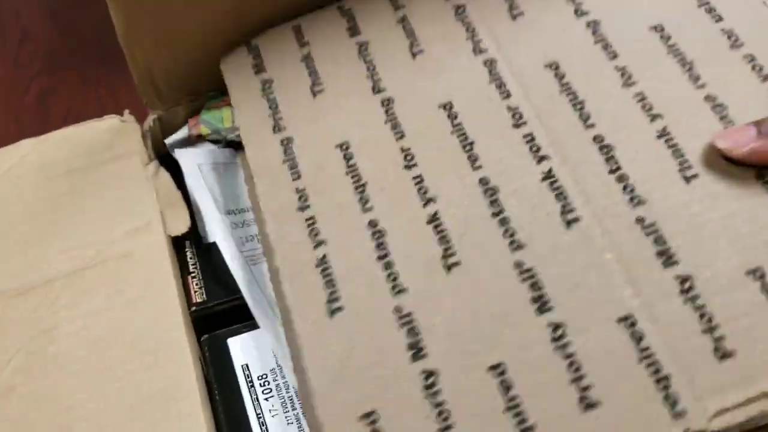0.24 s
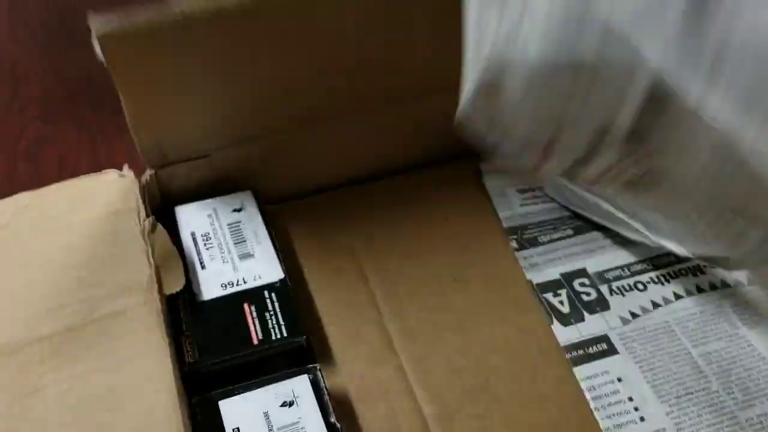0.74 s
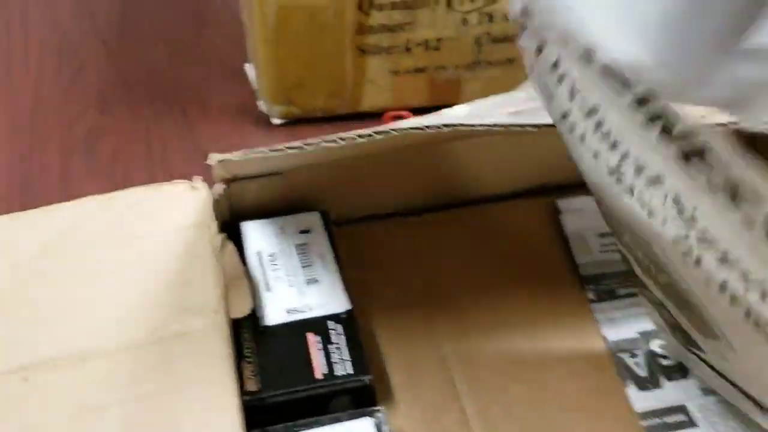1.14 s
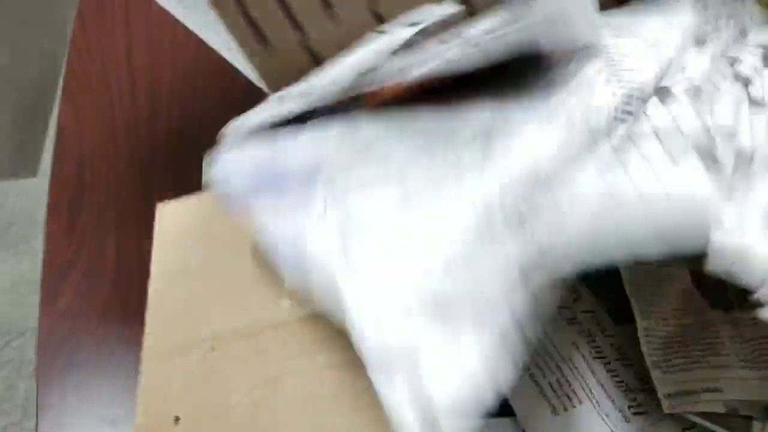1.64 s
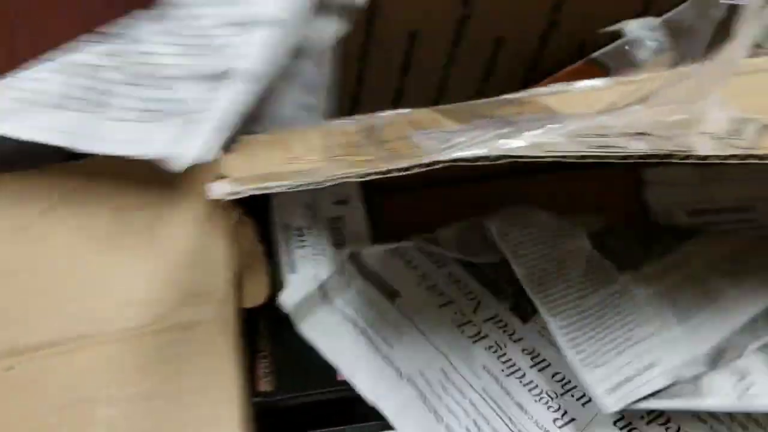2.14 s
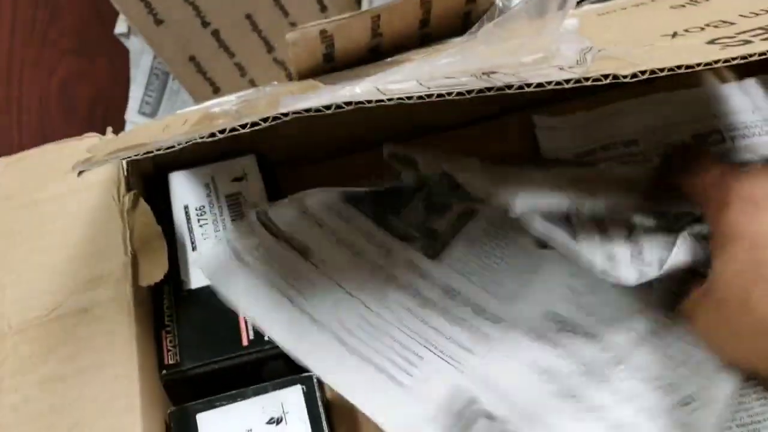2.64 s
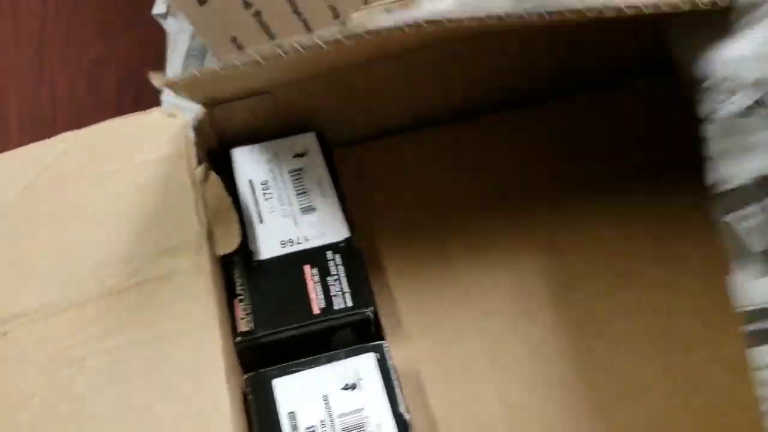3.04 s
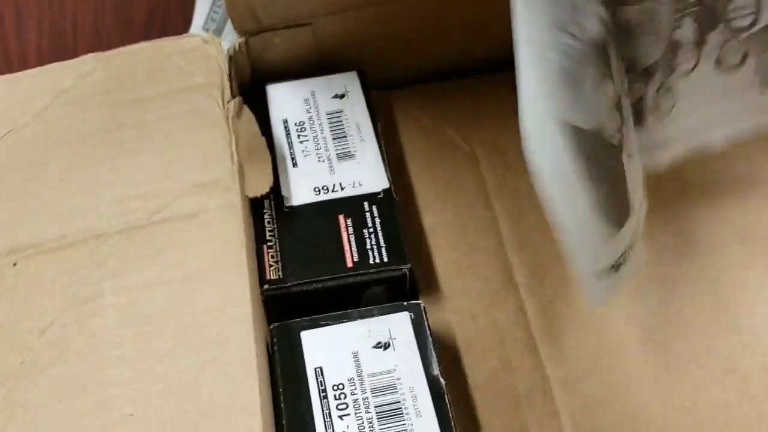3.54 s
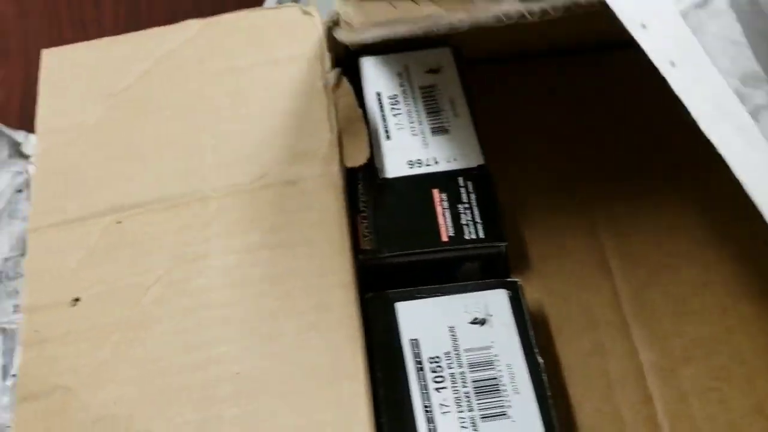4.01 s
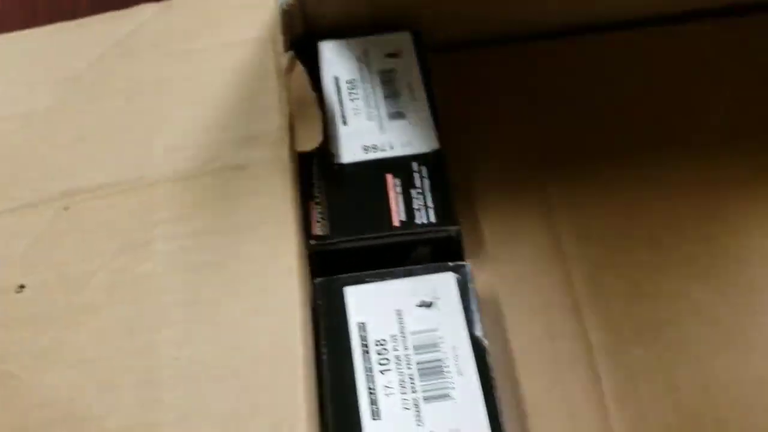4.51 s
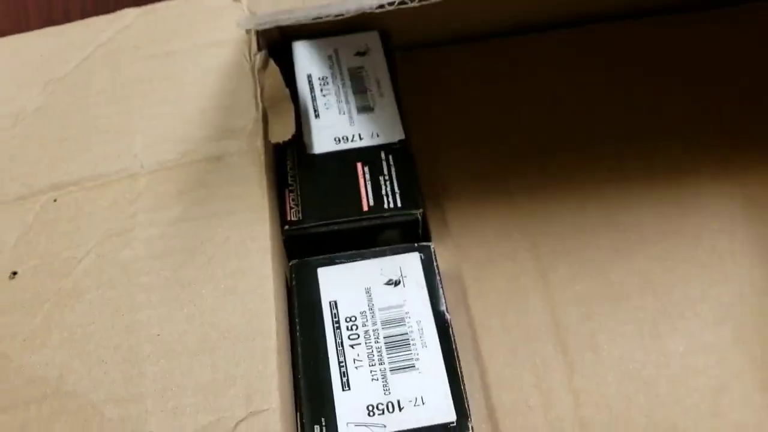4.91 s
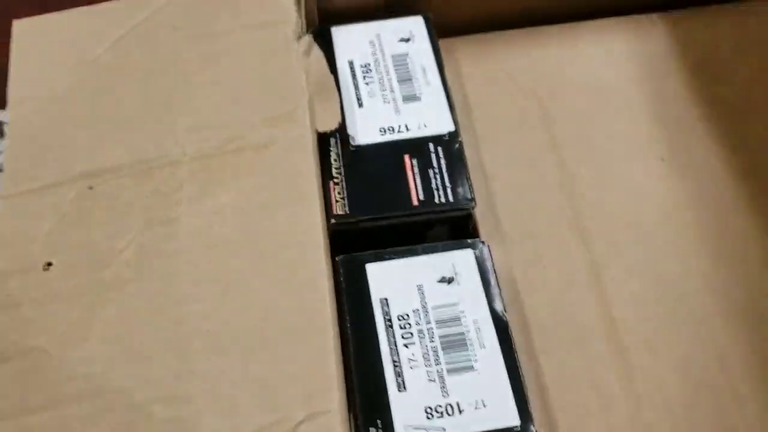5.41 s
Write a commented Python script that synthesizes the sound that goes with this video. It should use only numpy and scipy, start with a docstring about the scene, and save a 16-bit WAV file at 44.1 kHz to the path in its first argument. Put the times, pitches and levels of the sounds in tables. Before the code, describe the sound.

For the first second, a sheet of cardboard scrapes out of a box with a hollow rasp, over rustling newspaper and light knocks. The paper crinkles more softly until about 1.6 seconds, then picks up. Near 1.9 seconds the box is bumped with a deep, hollow boom, and smaller thumps follow until about 2.9. From 2.3 to 3.6 seconds the newspaper is at its loudest, dragged over the cardboard in uneven tugs, with many sharp, dry snaps as folds buckle. It eases around 4 seconds, gives another crackling burst at 4.3, and fades by 4.9. A short knock comes at about 5.1 seconds and a louder clattering knock on the box at 5.3, followed by a few faint paper ticks. Everything is close to a hand-held microphone with slight handling rumble, in a small room with a faint steady hum.

```python
"""Crumpled newspaper rustles and drags on cardboard as a hand pulls it out of a box, close to a
hand-held pair of microphones. The rustle is swarms of tiny creases; big folds snap as they buckle.
A sheet of card scrapes out in the first second, and the box booms, knocks and clacks when bumped.
The shaking microphones rumble; a small room answers and hums faintly."""
import sys
import numpy as np
from scipy import signal
from scipy.fft import rfft, irfft, next_fast_len
from scipy.io import wavfile

SR = 44100
rng = np.random.default_rng(int(sys.argv[2]) if len(sys.argv) > 2 else 0)


def to_wav(sig):
    """Store sig (one row per channel, or 1-D mono) as 16-bit WAV at the path in sys.argv[1].

    Samples outside -1..1 are clipped; the rate is SR.
    """
    pcm = np.clip(np.atleast_2d(sig), -1, 1) * 32767
    pcm = np.round(pcm).astype(np.int16)
    wavfile.write(sys.argv[1], SR, pcm.T)  # frames by channels


N = 249606
T = np.arange(N) / SR


def from_db(db):
    """Level to gain."""
    return 10 ** (np.asarray(db) / 20)


def unit_rms(x):
    """Scale to rms 1."""
    return x / np.sqrt(np.mean(x ** 2) + 1e-20)


def curve(rows):
    """(t/s, value) points to one value per sample."""
    return np.interp(T, *np.transpose(rows))


def butter(x, kind, hz, order=4):
    """Butterworth filter."""
    return signal.sosfilt(signal.butter(order, hz, kind, fs=SR, output="sos"), x)


def band(x, low_hz, high_hz):
    """Band-pass."""
    return butter(x, "band", [low_hz, high_hz], order=2)


def coloured(x, spectrum):
    """Minimum-phase filter with an (f/Hz, level/dB) response."""
    hz, db = np.transpose(spectrum)
    grid_hz = np.linspace(0, SR / 2, 513)
    gain = from_db(np.interp(np.log(grid_hz + 1), np.log(hz), db))
    taps = signal.minimum_phase(signal.firwin2(2047, grid_hz, gain ** 2, fs=SR), n_fft=2 ** 15)
    return signal.fftconvolve(x, taps[None], axes=-1)[..., :x.shape[-1]]


def drift(rate_hz):
    """Slow random wander, rms 1."""
    hop = 40
    pole = np.exp(-2 * np.pi * rate_hz * hop / SR)
    slow = signal.lfilter([1], [1, -2 * pole, pole * pole], rng.standard_normal(N // hop + 2002))[2000:]
    return np.interp(np.arange(N) / hop, np.arange(len(slow)), unit_rms(slow))


def ring(force, hz, t60_s):
    """One mode: a unit click starts a decaying sine of height 1."""
    r, w = from_db(-60 / (t60_s * SR)), 2 * np.pi * hz / SR
    return signal.lfilter([0, np.sin(w)], [1, -2 * r * np.cos(w), r * r], force + 1e-18)


def to_mics(x, lag_s):
    """Stereo pair; the left hears x later by lag_s."""
    return np.array([np.interp(T - lag_s / 2, T, x), np.interp(T + lag_s / 2, T, x)])


def puffs(per_s, t60_s, spread_db, clump_db=5.0):
    """Buckles or slips of uneven size, in random clumps; each is a short puff of noise."""
    born = rng.random(N) < per_s * from_db(clump_db * drift(25.)) / SR
    sizes = born * from_db(spread_db * np.minimum(rng.exponential(1, N), 4.5))
    power_decay = from_db(-120 / (t60_s * SR))
    power = signal.lfilter([1], [1, -power_decay], sizes ** 2 + 1e-18)
    return np.sqrt(power) * rng.standard_normal(N)


# Hand tugs: t/s, length/s, rustle level/dB, change over tug/dB,
# then re rustle: dull part/dB, fizz/dB, box panels/dB, box bottom/dB
TUGS = [(0.0, 0.0535, -36, -13.5, -11.5, -2.5, 4.5, 4), (0.07, 0.1052, -33, 3.5, -15, -5.5, -2, -3),
        (0.221, 0.076, -28.5, 0.5, -16, -5, -0.5, -6), (0.322, 0.0565, -34.5, 1, -8, -4.5, 0, -8.5),
        (0.406, 0.0855, -34, 4, -16.5, -8, -2, -7.5), (0.529, 0.2116, -30.5, -3.5, -10.5, -3, -4.5, -6.5),
        (0.769, 0.1772, -34.5, -1.5, -4, -6.5, -6.5, -8), (0.972, 0.1266, -43, -3, -3, -3, -2, -18),
        (1.13, 0.214, -47.5, 2, -7, 0, -8.5, -13.5), (1.374, 0.049, -43, -4.5, -7, -3, -10, -17.5),
        (1.458, 0.0904, -41.5, -3, -4, -2.5, -2.5, -28.5), (1.594, 0.134, -36.5, -6, -2.5, -3, -1.5, -1),
        (1.72, 0.111, -30.5, -3, -3.5, -5, -3.5, -6.5), (1.855, 0.18, -31.5, -2.5, -4.5, -5.5, 0, 2),
        (2.035, 0.144, -41.5, -6, -4, -2.5, -4, 2.5), (2.198, 0.0279, -30.5, 1.5, -8.5, -6, -3, 1),
        (2.258, 0.0554, -32, 5, -14, -5.5, -3.5, -3.5), (2.378, 0.058, -36, -0.5, -15, -8.5, -15, -4.5),
        (2.458, 0.127, -36.5, -0.5, -5.5, -6, -4, -3), (2.632, 0.1086, -30, -1.5, -5, -8, -2.5, -1.5),
        (2.744, 0.0646, -37, 9, -3, -3, -8, -5), (2.792, 0.139, -28.5, -4, -11.5, -5, -2, -4),
        (2.938, 0.084, -33.5, 5, -10, -4, -4.5, -11), (3.041, 0.0297, -35, 7.5, -9, -8, -8.5, -11),
        (3.097, 0.0757, -36.5, 9.5, -30.5, -4.5, -2.5, -4), (3.205, 0.1017, -31, -2.5, -5, -5.5, -2.5, -10),
        (3.363, 0.1246, -27, 1, -29.5, -6, -2, -14.5), (3.507, 0.078, -40.5, 1, 2.5, -7, -8.5, 1),
        (3.585, 0.08, -32.5, -4, -1, -5.5, -6.5, -6.5), (3.685, 0.1023, -32, -2, -4, -6, -9, -10),
        (3.886, 0.0683, -38, -10.5, 2, -7.5, -3.5, -5), (4.031, 0.059, -58, -0.5, 1, -10, 4, -13.5),
        (4.171, 0.0547, -53, 12, -5, -3, -3.5, -7.5), (4.273, 0.0655, -30.5, 0, -7.5, -12.5, -10, -10.5),
        (4.358, 0.1045, -31.5, -6.5, -5.5, -10.5, -6.5, -10.5),
        (4.504, 0.036, -41.5, 5.5, -8.5, -5, -6, -7.5), (4.572, 0.0203, -35, -3.5, 3.5, -6.5, -4, -30.5),
        (4.653, 0.205, -46, -3.5, -3, -2, -4, -6.5), (5.084, 0.03, -44, -8.5, -14, 4.5, -2, -19),
        (5.15, 0.0327, -45, 1.5, -10, 3, 2.5, -4), (5.214, 0.117, -54, 10, -5.5, 3, 7, 7.5),
        (5.308, 0.134, -34, -26.5, -7, -6.5, -5.5, -3.5), (5.436, 0.0578, -50, 3.5, -5.5, -6, -0.5, 5),
        (5.528, 0.026, -49.5, 0.5, -7, 4, 4, -13), (5.588, 0.017, -44.5, -2, -6.5, 2, -6.5, -12.5),
        (5.657, 0.018, -54.5, -7, 1.5, -10, 4.5, 10.5)]

def tug_levels_db():
    """Tugs swell, hold, let go; the sheet unfolds on softly. Gives rustle, dull, fizz, panels, bottom."""
    attack_s, release_db_per_s = 0.0481, 465
    settle_db, settle_db_per_s = -28, 11
    power, t = 1e-12, T[::20]
    for start_s, length_s, db, change_db, *parts_db in TUGS:
        swell = np.clip(1 + (t - start_s) / attack_s, 0, 1) ** 2
        hold = from_db(db + change_db * np.clip((t - start_s) / length_s, 0, 1))
        after_s = np.maximum(t - start_s - length_s, 0)
        release = from_db(np.maximum(-release_db_per_s * after_s, settle_db - settle_db_per_s * after_s))
        power = power + (swell * hold * release * from_db([0, *parts_db])[:, None]) ** 2
    return [np.interp(T, t, db) for db in 10 * np.log10(power)]


# Colour of sheet and microphones: f/Hz, level/dB
PAPER_SPECTRUM = [(410, -29), (700, -8.5), (1200, -5), (1630, -4), (2600, 0), (4200, 3), (5240, 1.5),
                  (6200, -2.5), (7540, -0.5), (8700, -10), (12400, -2.5), (15250, -3.5), (15800, -10)]
# Ring of each part of the sheet: f/Hz
PART_HZ = [1648, 2780, 3450, 4250, 5930, 6196, 7640, 11300]
# Place of each part: left lag/s
PART_LAG_S = [-.00042, .0002, -.00008, -.0003, .0001, -.00015, .0005, .00004]

def rustle(level_db, dull_db, fizz_db):
    """Creases, lone crinkles and dry ticks all over the sheet; slack paper is dull, taut paper fizzes."""
    swarm = 0
    for hz, lag_s in zip(PART_HZ, PART_LAG_S):
        creases = unit_rms(puffs(per_s=500, t60_s=0.0322, spread_db=2.5))
        small_folds = puffs(per_s=13, t60_s=0.0223, spread_db=1.3)
        crinkles = from_db(-14) * unit_rms(band(small_folds, hz / 1.3, hz * 1.3))
        ticks = from_db(-11) * unit_rms(puffs(per_s=40, t60_s=0.0099, spread_db=1.78))
        bend_gain = 0.425 * from_db(8.5 * drift(rate_hz=9.1))   # rings more or less as it bends
        ringing = bend_gain * band(creases, hz / 1.115, hz * 1.1035)
        swarm = swarm + to_mics(creases + ringing + crinkles + ticks, lag_s)
    swarm = coloured(swarm, PAPER_SPECTRUM)
    dull = unit_rms(butter(swarm, "low", 2400))
    middle = unit_rms(band(band(swarm, 2000, 9500), 2000, 9500))
    fizz = unit_rms(butter(swarm, "high", 8500))
    return from_db(level_db) * (from_db(dull_db) * dull + middle + from_db(fizz_db) * fizz)


# Box modes: f/Hz, level/dB, usual t60/s
BOX_MODES = [(109.93, -17, 0.346), (127.7, -6, 0.1104), (160, -2.5, 0.0955), (193.3, 8.5, 0.0162),
             (200.4, -4, 0.141), (239.99, 2.5, 0.0542), (276.3, 5.5, 0.0764), (338.3, 1, 0.1137),
             (368.4, 6, 0.0272), (411.6, 2, 0.0382), (475.7, 9, 0.0262), (620.1, 3, 0.0773),
             (734.8, 8.5, 0.0301), (744.7, -3.5, 0.1246), (923, -8, 0.0052), (1029, -18.5, 0.0113),
             (1310, -5, 0.0127), (1530, -4.5, 0.0226), (2010, -13, 0.0079), (2280, -13.5, 0.0134)]

def drag(panels_db, bottom_db):
    """Paper slides over the box in small slips that rasp and drive its damped modes."""
    t60_share = 0.342   # paper lying on the card damps it
    slips = unit_rms(puffs(per_s=1200, t60_s=0.00844, spread_db=2.9, clump_db=2.5))
    modes = np.zeros((len(BOX_MODES), N))
    for m, (hz, db, t60_s) in enumerate(BOX_MODES):
        coupling = (-1) ** m * (hz / 200) ** 0.457   # light paper moves low modes least
        modes[m] = from_db(db) * coupling * ring(slips, hz, t60_share * t60_s)
    deep = np.array(BOX_MODES)[:, 0] < 240
    rasp = band(puffs(per_s=1200, t60_s=0.007, spread_db=3.14, clump_db=2.5), 293, 1846)
    panels = unit_rms(unit_rms(modes[~deep].sum(0)) + 0.828 * unit_rms(rasp))
    bottom = unit_rms(modes[deep].sum(0))
    return from_db(bottom_db) * bottom + from_db(panels_db) * panels


# Card sliding out of the box: t/s, level/dB
SCRAPE_LEVEL = [(0.0, -46), (0.06, -57), (0.11, -42), (0.224, -43), (0.256, -37), (0.332, -45),
                (0.406, -39.5), (0.42, -26), (0.444, -47.5), (0.466, -34.5), (0.532, -64), (0.592, -36.5),
                (0.762, -43), (0.78, -34.5), (0.82, -51), (1.05, -59)]
# Card resonances: f/Hz, width/Hz, level/dB
CARD_BANDS = [(826, 204, 0.5), (1050.5, 146, 0), (1310, 220, -3.5), (1505, 285, -6.5)]

def scrape():
    """Dense slips of card on card rasp hollowly through its broad resonances."""
    silent_s = SCRAPE_LEVEL[-1][0] + .1
    level_db = curve(SCRAPE_LEVEL + [(silent_s, -90)])
    slips = puffs(per_s=900, t60_s=0.021, spread_db=3.47)
    rasp = sum(from_db(db) * band(slips, hz - width_hz / 2, hz + width_hz / 2)
               for hz, width_hz, db in CARD_BANDS)
    return to_mics(from_db(level_db) * unit_rms(rasp), lag_s=0.000136)


# Handling rumble: t/s, level/dB
SHAKE_LEVEL = [(0.0, -44.5), (0.22, -68), (0.28, -51.5), (0.38, -55.5), (0.49, -46), (0.55, -74),
               (0.6, -54), (0.71, -65.5), (0.77, -42.5), (0.98, -68.5), (1.83, -53), (1.84, -50.5),
               (2.27, -63), (2.32, -40.5), (2.38, -59), (2.49, -52.5), (2.95, -56.5), (3.0, -59.5),
               (3.51, -51), (3.55, -57.5), (4.22, -66), (4.32, -47.5), (4.93, -79), (5.03, -50.5),
               (5.14, -55.5), (5.26, -56.5), (5.31, -38.5), (5.44, -55.5), (5.5, -58), (5.66, -75.5)]

def shake():
    """The hand-held microphones shake: deep lumpy noise, slightly different in each."""
    mid, side = band(rng.standard_normal((2, N)), 42, 76)
    side = 0.24 * side
    return from_db(curve(SHAKE_LEVEL)) * unit_rms(np.array([mid + side, mid - side]))


# Noise floor: f/Hz, level/dB
HUM_SPECTRUM = [(15, -27), (25, -40.5), (76, -9.5), (219, -7.5), (420, -23.5), (1590, -28), (8520, -27.5),
                (9240, -30.5), (15100, -27), (16300, -13)]

def hum(level_db=-45):
    """Steady room and microphone noise, alike on both sides in the bass."""
    mid, side = rng.standard_normal((2, N))
    side = butter(side, "high", 500, order=2)
    return from_db(level_db) * unit_rms(coloured(np.array([mid + side, mid - side]), HUM_SPECTRUM))


def room(x, t60_s=0.258, wall_cut_hz=2260):
    """Wall echoes: eight feedback delays a side, duller on every round."""
    size = next_fast_len(N + SR)
    hz = np.arange(size // 2 + 1) * SR / size
    wall = 1 / (1 + 1j * hz / wall_cut_hz)
    response = np.zeros((2, len(hz)), complex)
    for k, lag_s in enumerate(rng.uniform(.006, .03, 16)):
        delay = np.exp(-2j * np.pi * hz * round(lag_s * SR) / SR)
        trip = from_db(-60 * lag_s / t60_s) * wall * delay
        response[k % 2] += trip / (1 - trip) * (-1) ** (k // 2)
    shared_bass = 1 / (1 + 1j * hz / 600)   # the microphones are close together
    mid = response.mean(0)
    response = mid + (1 - shared_bass) ** 2 * (response - mid)
    return irfft(response * rfft(x, size), size)[:, :N]


# Sharp snaps of paper folds and clacks on the box:
# t/s, level/dB, f/Hz, pitched band re broad noise/dB, t60/s, body re level/dB
SNAPS = [(.0777, -34.5, 7400, -7, 0.021, -14.5), (.23, -20.5, 3120, 10, 0.063, -14.5),
         (.4165, -20.5, 3700, 6.5, 0.085, -2.5), (.486, -22.5, 4800, 2.5, 0.023, -20),
         (.545, -21.5, 4600, -0.5, 0.044, -28), (.575, -18, 5020, -6.5, 0.0565, -21.5),
         (.8621, -19, 2050, -10, 0.052, -17.5), (.8967, -18.5, 3100, -6.5, 0.0127, -16.5),
         (.915, -24.5, 5230, 2.5, 0.0125, -30.5), (.927, -27.5, 2400, -1, 0.014, -21.5),
         (.937, -20.5, 6710, 8.5, 0.0114, -28.5), (.9587, -18.5, 3540, -3, 0.0165, -26.5),
         (.984, -25, 1900, 9.5, 0.0121, -23), (1.0056, -24, 4120, -17, 0.032, -17.5),
         (1.129, -25.5, 2480, 6.5, 0.023, -10), (1.169, -33, 7400, 9.5, 0.019, -18.5),
         (1.1946, -24, 5460, -2.5, 0.035, -13.5), (1.218, -25.5, 2530, 3, 0.026, -10),
         (1.238, -30, 1600, 8, 0.0226, -23.5), (1.255, -30.5, 3290, 10, 0.021, -22.5),
         (1.362, -23.5, 7260, 2, 0.053, -25.5), (1.382, -30.5, 6500, 5.5, 0.0156, -29.5),
         (1.4135, -27.5, 3700, -3.5, 0.04, -26), (1.4498, -21.5, 7260, 2, 0.024, -35),
         (1.4744, -25.5, 2600, 6.5, 0.0223, -22.5), (1.5898, -26, 1590, -14, 0.03, -16.5),
         (1.5998, -15.5, 1673, -3, 0.028, -33.5), (1.618, -21.5, 3020, 11.5, .02, -18.5),
         (1.6697, -19, 2070, -10, 0.047, -14.5), (1.6983, -16.5, 7360, 5.5, 0.0133, -18),
         (1.8256, -18, 3030, 11.5, 0.0133, -21), (1.8517, -19, 1780, 14, 0.0486, -1.5),
         (1.8851, -15, 5060, 6.5, 0.026, -9), (1.9395, -23, 4100, 6, 0.019, -20.5),
         (1.974, -12.5, 1370, -1, 0.068, -29.5), (2.185, -32, 3580, 4.5, 0.03, 1.5),
         (2.2739, -11.5, 4610, 17, 0.0176, -33.5), (2.2924, -6, 4130, 6, 0.0234, -21.5),
         (2.312, -13, 4800, 5.5, 0.026, -14.5), (2.325, -22.5, 6500, 3, 0.0088, -30),
         (2.377, -20, 3800, -14, 0.027, -16), (2.4153, -8.5, 4490, 1, 0.0184, -20),
         (2.4407, -12.5, 3190, -5, 0.022, -32), (2.4812, -13.5, 6560, -21.5, 0.014, -50),
         (2.5015, -13, 3530, 1, 0.0157, -11.5), (2.5389, -20, 1594, -2, 0.033, -31),
         (2.6135, -12, 3600, -15, 0.019, -30), (2.6549, -10.5, 3460, -1, 0.0445, -35.5),
         (2.7055, -11.5, 3500, 3.5, 0.017, -31.5), (2.7125, -6.5, 5620, -3, 0.0335, -36),
         (2.7464, -13, 3404, 0, 0.0345, -21.5), (2.7939, -27, 2750, -9, 0.062, -25.5),
         (2.8275, -4.5, 7590, -0.5, 0.0181, -18.5), (2.8722, -9, 5200, -1, 0.0098, -12.5),
         (2.9135, -12.5, 1700, -7, 0.0454, -18.5), (2.929, -13, 2460, -18.5, 0.0496, -22.5),
         (2.9941, -20.5, 4870, 4, 0.086, -15), (3.031, -16, 4500, 5.5, 0.016, -29),
         (3.0423, -14, 4080, -0.5, 0.026, -30.5), (3.057, -6.5, 5720, -4.5, 0.044, -28),
         (3.0695, -7, 4960, -2, 0.019, -15), (3.105, -21.5, 4290, 5, 0.0216, -16.5),
         (3.1254, -20, 4120, 3.5, 0.016, -3), (3.1958, -10, 4540, -18, 0.0505, -16),
         (3.2545, -18.5, 5000, 5, 0.017, -15.5), (3.2655, -7.5, 4200, 0.5, 0.021, -20),
         (3.2695, -13.5, 4120, 7.5, 0.019, -22), (3.288, -26, 6500, -0.5, 0.014, -21.5),
         (3.2956, -3.5, 8070, -2, 0.0158, -23), (3.3575, -11, 4200, -7.5, 0.032, -13.5),
         (3.3803, -2.5, 5170, 7.5, 0.0075, -18), (3.3826, -4.5, 6530, 4, 0.0112, -20),
         (3.434, -11.5, 7300, -2.5, .01, -31.5), (3.5225, -13, 5530, -16.5, 0.058, -19),
         (3.5798, -5, 6480, 6, 0.0113, -21.5), (3.597, -18.5, 6500, -1, 0.0197, -19.5),
         (3.6598, -25.5, 2240, -1, 0.0223, -6.5), (3.708, -15.5, 3480, -7, 0.038, -18),
         (3.716, -20.5, 2180, 1.5, 0.0253, -12.5), (3.741, -18, 3300, 5, 0.017, -24),
         (3.76, -25, 2260, 6, 0.0235, -24.5), (3.787, -23.5, 2740, 10.5, 0.0314, -16),
         (3.8745, -19.5, 3400, 0, 0.029, -13), (3.9883, -27.5, 6260, -1.5, 0.0576, -17),
         (3.997, -31, 4960, -8.5, 0.0284, -12.5), (4.0356, -32, 3570, -8.5, 0.128, -19.5),
         (4.1568, -32, 1800, 4, 0.029, -14), (4.2558, -16.5, 4030, 3, 0.013, -12),
         (4.269, -12, 3560, 14, 0.02, -23), (4.2925, -10.5, 3630, -1.5, 0.097, -19.5),
         (4.3045, -3.5, 3520, -7, 0.0323, -29), (4.3126, -5.5, 3630, -3.5, 0.0351, -23),
         (4.3923, -16.5, 3560, 17.5, 0.0213, -9.5), (4.432, -13, 4000, -10.5, 0.0133, -14),
         (4.4533, -20.5, 4170, 0.5, 0.0115, -7.5), (4.4665, -20, 5970, -1.5, 0.0077, -18.5),
         (4.5052, -22.5, 5010, 14, .015, -26.5), (4.517, -16, 4730, -2, 0.0214, -23),
         (4.563, -12, 4700, -8, 0.0148, -27), (4.575, -13, 2570, -7.5, 0.044, -36),
         (4.6865, -24.5, 1666, -0.5, 0.059, -20.5), (5.0744, -29.5, 7600, 11, 0.028, -9.5),
         (5.0882, -17, 1600, -3, 0.0144, -1), (5.2988, -9, 2060, -3.5, 0.0175, -10.5),
         (5.3137, -40, 1550, 23, 0.027, 5), (5.462, -29, 1996, -16, 0.014, -9.5),
         (5.5283, -28, 4030, -0.5, 0.0141, -20.5), (5.591, -32.5, 2320, 4.5, 0.019, -9.5)]

def snaps(sheet_fizz_db):
    """Paper folds buckle, knocks on the box clack: broad bursts with a pitched band and a duller body."""
    crack_db, crack_t60_s = -7.5, 0.001
    fizz_at_4khz_db, fizz_db_per_octave = 3.5, 4.5
    out, size = np.zeros((2, N)), round(.12 * SR)
    t = np.arange(size) / SR
    noise = rng.standard_normal((len(SNAPS), 5, size))
    shared_broad, shared_pitched, body_noise = noise[:, :1], noise[:, 1], noise[:, 2]
    per_mic = noise[:, 3:]   # each microphone hears partly its own burst
    broad = coloured((shared_broad + 4.45 * per_mic).reshape(-1, size), PAPER_SPECTRUM)
    broad = unit_rms(broad).reshape(-1, 2, size)
    dull, fizz = butter(broad, "low", 8500), butter(broad, "high", 8500)
    for k, (start_s, level_db, hz, pitched_db, t60_s, body_db) in enumerate(SNAPS):
        at = round(start_s * SR)
        rise_s = 0.05136 * t60_s   # long snaps rise slowly
        crack = from_db(crack_db - 60 * np.abs(t - rise_s) / crack_t60_s)
        decay = from_db(-60 * np.maximum(t - rise_s, 0) / t60_s)
        envelope = np.clip(t / rise_s, 0, 1) * decay * (1 + crack)
        reach_hz = 187 + 0.0636 * hz
        pitched = band(shared_pitched[k] + 1.1 * per_mic[k, :, ::-1], hz - reach_hz, hz + reach_hz)
        fizz_db = sheet_fizz_db[at] + fizz_at_4khz_db + fizz_db_per_octave * np.log2(hz / 4000)
        burst = envelope * (dull[k] + from_db(fizz_db) * fizz[k] + from_db(pitched_db) * unit_rms(pitched))
        burst /= np.max(np.abs(burst), axis=1).mean()
        body = envelope * unit_rms(band(body_noise[k], 229, 1260))
        snap = from_db(level_db) * (burst + from_db(body_db) * body)
        left_at = at + round(SR * PART_LAG_S[k % len(PART_LAG_S)])
        out[0, left_at:left_at + size] += snap[0, :N - left_at]
        out[1, at:at + size] += snap[1, :N - at]
    return out


# Bumps on the box: t/s, level/dB, best excited f/Hz, spread/octaves, t60 re usual t60/ratio
BUMPS = [(.123, -25, 400, 0.22, 1.07), (.274, -50.5, 394, 0.22, 1.1), (.356, -25.5, 376, 0.17, 0.7),
         (.406, -26, 427, 0.112, 0.8), (.475, -23, 400, 0.48, 1.1), (.56, -40, 334, 0.26, 1.2),
         (.585, -26.5, 326, 0.24, 1.25), (.628, -27.5, 433, 0.104, 0.97), (.675, -31.5, 200, 0.294, 1.1),
         (.783, -23.5, 378, 0.32, 0.7), (.864, -32, 634, 0.39, 0.83), (1.193, -39.5, 175.4, 0.186, 1.52),
         (1.461, -50, 117, 0.25, .96), (1.584, -28.5, 144, 0.35, 1.08), (1.85, -5, 124.8, 0.187, 1.23),
         (1.884, -10, 152, 0.294, 0.69), (1.915, -21, 111, 0.15, 1.7), (1.851, -27, 770, 0.102, 1.1),
         (1.945, -24.5, 130, 0.225, 1.1), (1.973, -16.5, 345, 0.155, 1.56), (1.981, -16, 355, 0.156, 0.76),
         (1.992, -13, 150, 0.415, 0.67), (2.022, -18.5, 240.4, 0.17, 1.24), (2.05, -22.5, 125, 0.367, 1.33),
         (2.098, -26, 151, 0.302, 1.17), (2.207, -20, 137, 0.417, 1.72), (2.225, -19.5, 152, 0.425, 0.81),
         (2.4695, -17.5, 191, 0.334, 1.18), (2.544, -22.5, 151, 0.242, 0.97),
         (2.566, -22.5, 168.5, 0.234, 1.55), (2.63, -25.5, 150, 0.23, 1.32),
         (2.656, -15.5, 171, 0.524, 2.3), (2.672, -18.5, 141.7, 0.15, 1.73),
         (2.695, -18, 143.7, 0.268, 1.25), (2.719, -21.5, 153, 0.195, 0.62),
         (2.865, -24.5, 135.5, 0.218, 1.5), (2.921, -16.5, 490, 0.228, 0.346),
         (3.399, -27, 157.7, 0.138, 3.64), (3.441, -28, 151, 0.061, 2.73),
         (3.479, -38.5, 158.4, 0.16, 1.06), (3.868, -42.5, 337, 0.13, 1.2),
         (4.313, -12.5, 686, 0.167, 0.35), (4.335, -24, 144, 0.086, 1.53), (5.025, -19, 137.1, 0.136, 0.59),
         (5.025, -58, 780, 0.137, 0.89), (5.0885, -10, 356, 0.293, 0.32), (5.0885, -27, 1400, 0.47, 0.94),
         (5.288, -12.5, 387, 0.28, 2.38), (5.2882, -17, 1260, 0.36, 1.24), (5.2985, -8, 351, 0.25, 0.55),
         (5.2992, -17.5, 2020, 0.25, 0.75), (5.31, -11.5, 344, 0.096, 0.76), (5.318, -17, 325, 0.45, 0.49),
         (5.321, -18, 143.7, 0.227, 1.1), (5.314, -19, 770, 0.1, 0.45), (5.352, -34.5, 339, 0.087, 2.8),
         (5.415, -35, 336, 0.073, 1.13), (5.589, -34.5, 803, 0.068, 0.76)]

def knocks():
    """A bump rings the box modes, most of all near one pitch, shorter or longer than their usual t60."""
    contact_cycles, floor_share = 0.322, 0.0347
    out, size = np.zeros(N), round(.45 * SR)
    t = np.arange(size) / SR
    hz, mode_db, t60_s = np.transpose(BOX_MODES)[:, :, None]
    scatter_db = rng.normal(0, 1.5, (len(BUMPS), len(BOX_MODES), 1))
    for k, (start_s, level_db, best_hz, octaves, t60_ratio) in enumerate(BUMPS):
        share = np.exp(-.5 * (np.log2(hz / best_hz) / octaves) ** 2) + floor_share
        envelopes = share * from_db(mode_db + scatter_db[k] - 60 * t / (t60_ratio * t60_s))
        contact = 1 - np.exp(-t * best_hz / contact_cycles)   # deep bumps start softly
        bump = -contact * (envelopes * np.sin(2 * np.pi * hz * t)).sum(0)
        bump /= np.max(np.abs(bump))
        at = round(start_s * SR)
        out[at:at + size] += from_db(level_db) * bump[:N - at]
    return out


# Sheet position: t/s, left minus right level/dB
SHEET_PAN = [(0.0, 0.0), (2.25, 0.5), (2.43, 0), (2.47, 0.0), (3.69, 0), (3.78, 0.5), (3.97, -0.5),
             (4.22, 0.0), (4.29, -2.5), (4.36, 0.0), (4.9, 0.5), (5.09, -0.5), (5.5, 1), (5.58, -0.5),
             (5.66, 2)]

def scene():
    """Paper, box and card near the microphones, in a small room."""
    room_db = -16.5
    rustle_db, dull_db, fizz_db, panels_db, bottom_db = tug_levels_db()
    crackle = rustle(rustle_db, dull_db - rustle_db, fizz_db - rustle_db) + snaps(fizz_db - rustle_db)
    pan_db = curve(SHEET_PAN)
    crackle *= from_db([pan_db / 2, -pan_db / 2])
    box = butter(knocks() + drag(panels_db, bottom_db), "high", 88)   # small panels radiate no deep bass
    near = crackle + to_mics(box, lag_s=0.0001625) + scrape()
    return near + from_db(room_db) * room(near.mean(0)) + hum() + shake()


def record(dry):
    """Round the peaks, cut the top treble."""
    ceiling, cutoff_hz = .9, 16500
    rounded = ceiling * np.tanh(dry / ceiling)
    return signal.sosfilt(signal.cheby2(12, 70, cutoff_hz, fs=SR, output="sos"), rounded)


dry = scene()
out = record(dry)
to_wav(out)
```